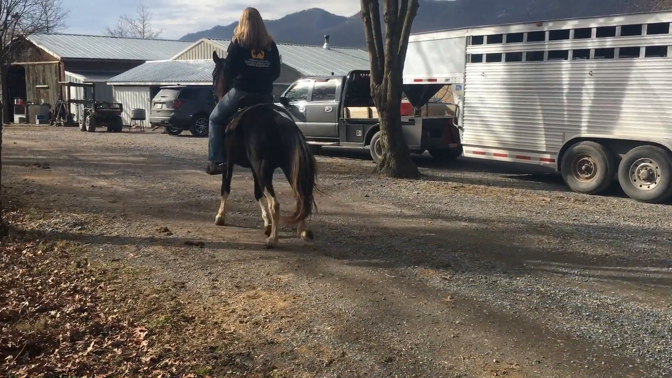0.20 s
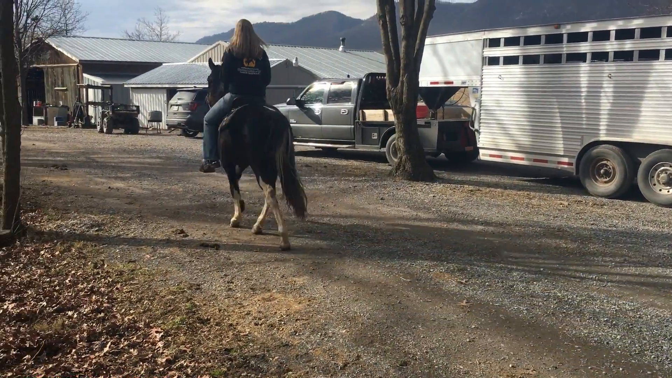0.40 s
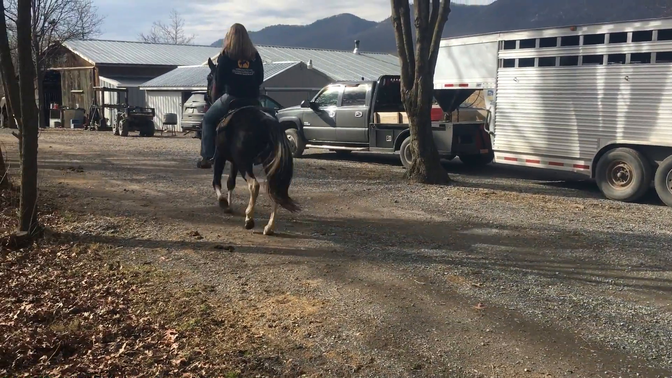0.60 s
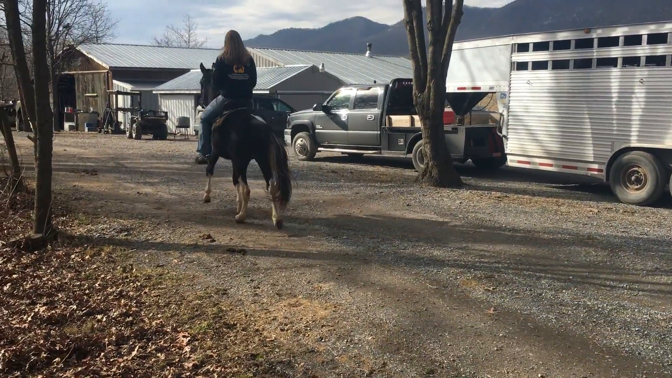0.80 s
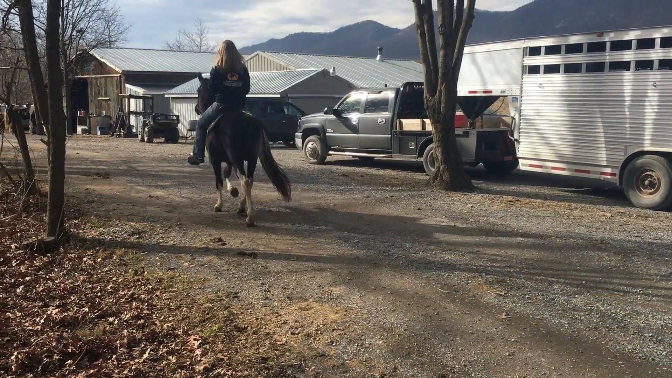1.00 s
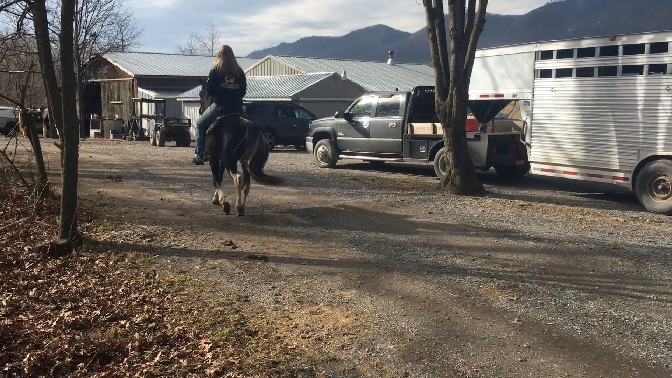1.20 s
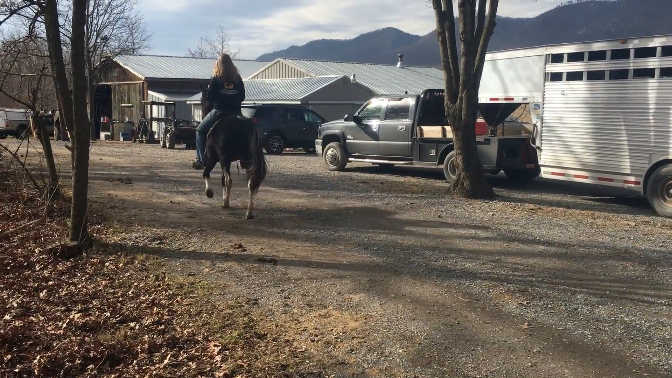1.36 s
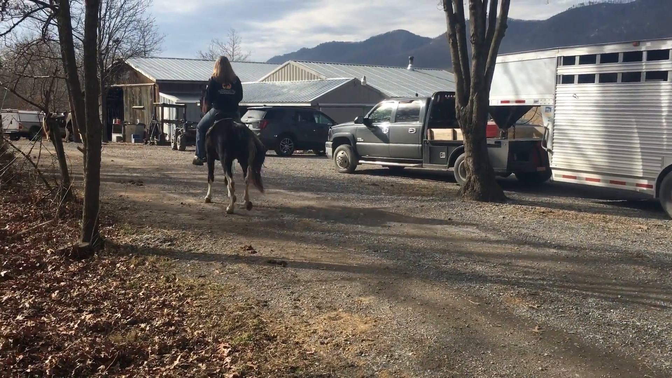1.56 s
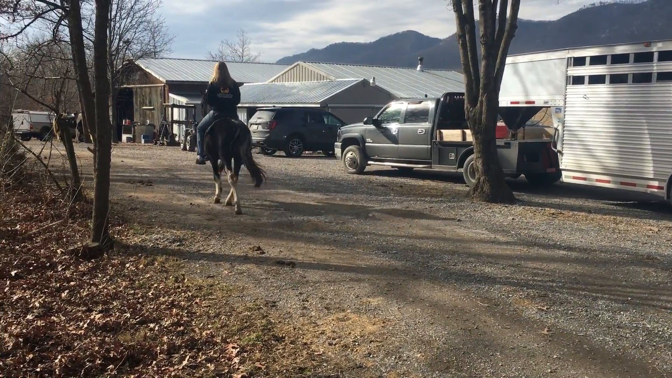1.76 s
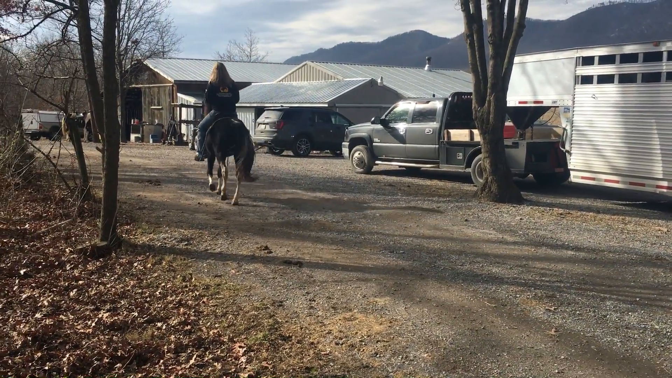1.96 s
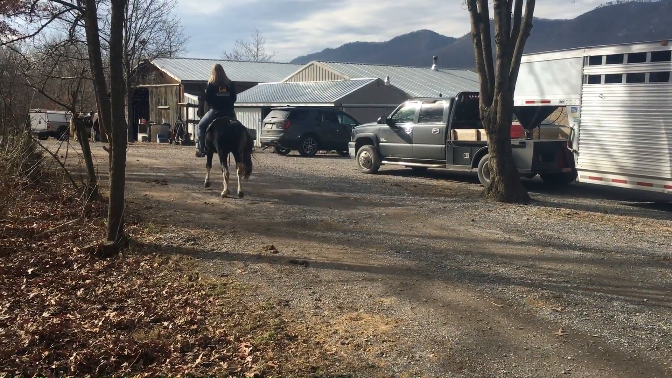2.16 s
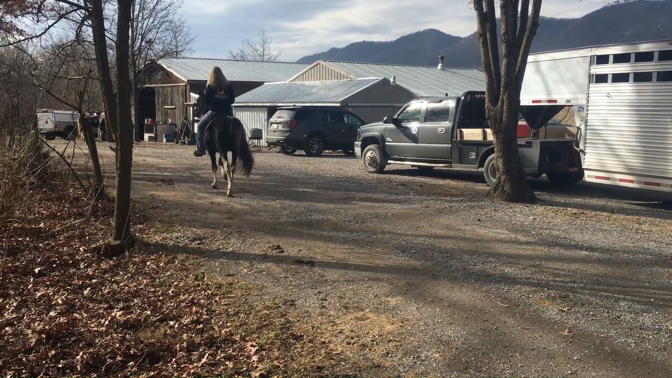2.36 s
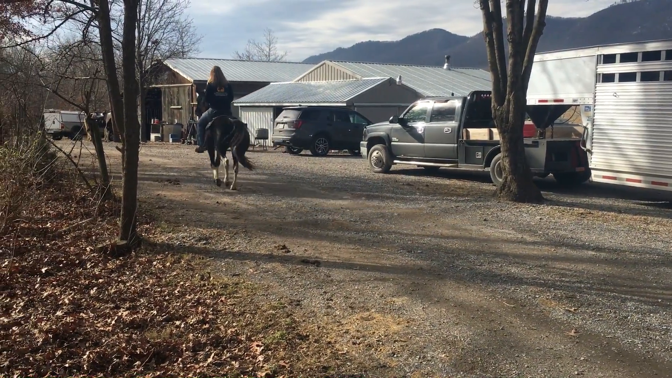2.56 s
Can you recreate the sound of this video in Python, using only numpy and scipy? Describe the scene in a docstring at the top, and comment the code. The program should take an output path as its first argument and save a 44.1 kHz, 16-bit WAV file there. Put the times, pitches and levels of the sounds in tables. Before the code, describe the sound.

Hooves of a briskly walking horse crunch over gravel near the microphone in an open yard. Larger stones knock, chips tick and loose grit settles between the steps, over a quiet rumble and a faraway drone.

```python
"""Horse on a gravel drive

Outdoors, on one microphone: a horse walks briskly by. Each hoof packs the gravel in a crunch
of tiny stone clicks over a soft thud; larger stones knock and chips tick. Grit trickles between
steps and the yard answers faintly, over a low rumble and a distant drone and hum."""
import sys
import numpy as np
from scipy import signal
from scipy.io import wavfile
from scipy.ndimage import uniform_filter1d

SR = 44100
rng = np.random.default_rng(int(sys.argv[2]) if len(sys.argv) > 2 else 0)


def materialize(psi):
    """Save the field psi as 16-bit PCM at rate SR to the path in sys.argv[1].

    A 1-D psi becomes a single channel; in a 2-D psi each row is a channel.
    """
    bounded = np.clip(np.atleast_2d(psi).T, -1, 1)
    quanta = np.round(bounded * 32767).astype(np.int16)
    wavfile.write(sys.argv[1], SR, quanta)


N = 116865


def amp(db):
    """Decibels to gain."""
    return 10 ** (np.asarray(db) / 20)


def unit(x):
    """Scales to rms 1."""
    return x / np.sqrt(np.mean(x ** 2) + 1e-20)


def as_loud_as(x, reference):
    """Scales to the rms of the reference."""
    return unit(x) * np.sqrt(np.mean(reference ** 2))


def read(points, hz):
    """Reads a spectrum on a log-frequency axis."""
    f, value = np.transpose(points)
    return np.interp(np.log(hz + 1), np.log(f + 1), value)


def fader(levels):
    """Gain that glides through (time, level) points."""
    return amp(np.interp(np.arange(N) / SR, *np.transpose(levels)))


def treble(hz, start_hz=1600):
    """Octaves above the start of the treble, up to two."""
    return np.clip(np.log2((hz + 1) / start_hz), 0, 2)


def add(mix, s, sound):
    """Mixes a sound in at time s."""
    part = mix[round(s * SR):][:len(sound)]
    part += sound[:len(part)]


def colour(x, db_at, size=2048):
    """Causal filter whose gain in dB is the function db_at of frequency."""
    log_gain = np.log(amp(db_at(abs(np.fft.fftfreq(size, 1 / SR)))))
    taps = np.fft.ifft(np.exp(np.conj(signal.hilbert(log_gain)))).real
    return signal.fftconvolve(x, taps[:size // 2])[:len(x)]


def clicks(length, per_s, spread_db):
    """Stones touch at random moments, most lightly and a few hard."""
    chance, sign = rng.random((2, length))
    force = amp(spread_db * np.minimum(rng.exponential(1, length), 4))
    return (chance < per_s / SR) * np.sign(sign - .5) * force


def pebbles(length, per_s=3400, sizes=20, decay_cycles=1.41):
    """Each random click rings one size of pebble for a few cycles."""
    hits, kind = clicks(length, per_s, spread_db=3.5), rng.integers(0, sizes, length)
    t, out = np.arange(256) / SR, np.zeros(length)
    for k, hz in enumerate(np.geomspace(650, 7000, sizes)):
        ring = np.cos(2 * np.pi * hz * t) * np.exp(-t * hz / decay_cycles) * hz / SR * 9
        ring[0] += .6  # the contact itself
        out += np.convolve(hits * (kind == k), ring)[:length]
    return out


# Colour of the open air, far off (frequency [Hz], gain [dB])
AIR_COLOUR = [(15, -33), (35, -36), (70, -13), (105, 9), (136, 6.5), (200, 0), (300, -2), (513, -13),
              (900, -5), (1290, -8.5), (2080, -19), (3070, -14), (4000, -25.5), (6720, -37.5),
              (10500, -39.5), (16000, -44)]

def air(level_db=-56, patch_db=3.5):
    """Distant outdoor drone and faint hiss, drifting in patches."""
    hz = np.fft.rfftfreq(1024, 1 / SR)
    real, imag, patches = rng.standard_normal((3, N // 256 + 5, len(hz)))
    patches = uniform_filter1d(patches, size=14, axis=0)  # smooth in time
    patches = unit(uniform_filter1d(patches, size=8, axis=1))  # and in frequency
    spectra = (real + 1j * imag) * amp(read(AIR_COLOUR, hz) + patch_db * patches)
    return amp(level_db) * unit(signal.istft(spectra.T, nperseg=1024, noverlap=768)[1][:N])


# Rumble at the microphone (time [s], level [dB])
RUMBLE_SWELLS = [(0, -61.5), (.2, -61), (.38, -56), (.46, -64.5), (.6, -47.5), (.68, -62), (0.769, -48),
                 (.87, -61), (.96, -51), (1.03, -54.5), (1.14, -51.5), (1.35, -57), (1.58, -56.5),
                 (1.9, -56.5), (2.1, -53), (2.33, -57.5), (2.45, -60.5), (2.65, -53.5)]
# Colour of the rumble (frequency [Hz], gain [dB])
RUMBLE_COLOUR = [(15, -29), (30, -5), (45, -6), (65, 4.5), (90, -3), (140, -7), (250, -18), (600, -55)]

def rumble():
    """A low outdoor rumble that swells and sinks."""
    low = colour(rng.standard_normal(N), lambda hz: read(RUMBLE_COLOUR, hz), size=8192)
    return unit(low) * fader(RUMBLE_SWELLS)


def hum(hz=135.5, level_db=-61.5, waver=0.024, flutter=0.47):
    """A faint hum in the distance, wavering in pitch and level."""
    slow = uniform_filter1d(uniform_filter1d(rng.standard_normal((2, N)), size=4000), size=2000)
    drift, swell = map(unit, slow)
    phase = 2 * np.pi * np.cumsum(hz * (1 + waver * drift)) / SR
    return amp(level_db) * unit(np.sin(phase) * (1 + flutter * swell))


# Colour of the drive's crushed gravel (frequency [Hz], gain [dB])
GRAVEL_COLOUR = [(100, -42.5), (420, -6.5), (650, 4), (1000, 2), (1600, 3.5), (2050, -8.5), (2600, -1.5),
                 (3250, 2.5), (3800, -16), (6300, -23), (8500, -31), (15000, -75)]
# Loose grit on the drive (time [s], level [dB])
GRIT_LEVELS = [(0, -53), (.2, -61.5), (.35, -55.5), (.5, -63.5), (.72, -55.5), (.88, -64), (1.0, -49.5),
               (1.19, -64), (1.32, -48.5), (1.46, -52), (1.59, -59.5), (1.8, -56), (1.9, -63.5), (2.1, -52),
               (2.23, -73), (2.42, -51), (2.55, -81), (2.65, -48)]

def grit():
    """Kicked grit rolls and settles between the steps."""
    trickle = colour(pebbles(N, per_s=1300), lambda hz: read(GRAVEL_COLOUR, hz))
    return unit(trickle) * fader(GRIT_LEVELS)


def hoof_load(t, hold_s, attack_s, release_s, sag_db_per_s=92):
    """Rises, sags while the hoof bears down, then dies away."""
    release = np.exp(-np.maximum(t - hold_s, 0) / release_s)
    return np.minimum(t / attack_s, 1) * amp(-sag_db_per_s * t) * release


# Colour of the soft ground under the drive (frequency [Hz], gain [dB])
THUD_COLOUR = [(25, -29), (60, -13.5), (110, -12.5), (165, -6), (195, 1.5), (235, -13.5), (330, -17),
               (500, -34), (1500, -60.5)]
# Colour of a stone chip's tick (frequency [Hz], gain [dB])
CHIP_COLOUR = [(200, -4), (1200, 18.5), (3000, 11.5), (4200, -8), (6300, 10), (8500, -10), (12500, -18.5),
               (16000, -21.5)]
# Hooves on gravel (time [s], hold [s], level [dB], ring [Hz], treble [dB/octave], thud [dB])
HOOF_CRUNCHES = [ (.002, 0.0092, -39, 2520, 4, -52), (.061, .007, -36.5, 1410, 4, -45),
                 (.236, 0.013, -36, 910, 0, -44), (0.245, 0.031, -37.5, 860, 6, -44),
                 (.405, 0.0058, -44, 800, 2.5, -45.5), (.568, 0.0047, -39.5, 1060, 7, -43),
                 (0.577, 0.026, -32.5, 1090, -1, -48.5), (0.656, 0.011, -39.5, 1620, 1.5, -58),
                 (.692, 0.0093, -43, 1380, 1, -76), (0.707, 0.0048, -42, 1600, 1, -47.5),
                 (0.836, 0.0061, -50, 1140, 1, -66), (.914, 0.017, -33, 1410, 3, -55),
                 (0.941, 0.0053, -34.5, 1420, 6.5, -76), (0.976, 0.014, -39.5, 1300, 3.5, -52),
                 (1.062, 0.004, -32, 1190, -13.5, -58), (1.085, 0.008, -39.5, 1180, -6, -48),
                 (1.24, 0.023, -33, 1190, -1.5, -44.5), (1.266, 0.021, -36.5, 1510, 3, -45),
                 (1.325, 0.061, -47.5, 1300, 9, -55), (1.383, 0.015, -41.5, 1300, 3.5, -45.5),
                 (1.404, 0.002, -25.5, 1600, -4, -39.5), (1.423, 0.017, -50, 1260, 7, -55),
                 (1.619, 0.01, -30.5, 1390, 3.5, -53), (1.638, 0.015, -38, 1300, 4, -48.5),
                 (1.690, 0.026, -44.5, 1280, 4, -53.5), (1.722, 0.024, -34, 1290, -2, -54.5),
                 (1.757, 0.0096, -37.5, 1300, 2, -66), (1.929, 0.008, -34.5, 1430, 3.5, -44),
                 (1.947, 0.015, -35.5, 1280, -1.5, -40.5), (1.966, 0.0094, -41, 1460, 3.5, -44.5),
                 (2.070, 0.013, -37, 1170, -0.5, -58), (2.274, 0.0089, -32.5, 1280, 1, -67),
                 (2.289, 0.017, -40.5, 1160, 2, -59), (2.375, 0.0054, -48, 2480, 4.5, -62),
                 (2.407, 0.007, -39.5, 1250, 3, -67), (2.613, 0.017, -40, 980, 0, -52)]

def crunch(hold_s, level_db, ring_hz, tilt, thud_db, size=6000):
    """A hoof packs the gravel, makes the finest chips tick, and pushes on the ground below."""
    def packed_gravel(hz):
        octaves = np.log2((hz + 1) / ring_hz)
        resonance_db = 9 * np.exp(-.5 * (octaves / 0.25) ** 2)
        return read(GRAVEL_COLOUR, hz) + resonance_db + tilt * treble(hz)
    t = np.arange(size) / SR
    press = hoof_load(t, hold_s, attack_s=0.0027, release_s=0.0068)
    stones = as_loud_as(colour(pebbles(size) * press, packed_gravel), press)
    push = hoof_load(t, hold_s, attack_s=0.0079, release_s=0.0073)
    thud = colour(rng.standard_normal(size) * push, lambda hz: read(THUD_COLOUR, hz))
    ticks = colour(clicks(size, per_s=270, spread_db=1.5), lambda hz: read(CHIP_COLOUR, hz))
    fines = amp(tilt - 29.5) * unit(ticks) * press
    return amp(level_db) * (stones + fines) + amp(thud_db) * as_loud_as(thud, push)


# Reverberation of the yard (frequency [Hz], time to fall 60 dB [s])
YARD_DECAY = [(150, 0.43), (1200, 0.36), (3200, 0.37), (6000, 0.39), (12000, 0.14)]

def yard(x, echoes_per_s=2000, gap_s=.012):
    """Scattered echoes come back to the microphone from trees, vehicles and barns."""
    echoes = rng.standard_normal(SR) * (rng.random(SR) < echoes_per_s / SR)
    echoes *= np.arange(SR) > gap_s * SR
    hz, t, spectra = signal.stft(echoes, SR, nperseg=256)
    decay = amp(-60 * t / read(YARD_DECAY, hz)[:, None])
    tail = signal.istft(spectra * decay, SR, nperseg=256)[1]
    return signal.fftconvolve(x, tail / np.linalg.norm(tail))[:N]


# Colour of a sharp stone crack (frequency [Hz], gain [dB])
CRACK_COLOUR = [(100, -35.5), (300, -3.5), (450, -9), (600, -1), (1000, -1.5), (1600, 0.5), (2050, -4),
                (3100, 4), (3800, -17.5), (6300, -18), (8500, -36), (15000, -44.5)]
# Larger stones (time [s], relative level [dB], ring [Hz], crack over ring [dB], treble [dB/octave])
STONE_KNOCKS = [ (0.052, -32.5, 1430, 5.5, -11), (.2483, -23, 873, 1.5, -1.5), (.3812, -19, 733, -8, -2),
                (0.5755, -17, 1020, -11, 2.5), (0.5924, -23, 1130, -11.5, 13), (0.5981, -26, 1390, 4, -7),
                (.6650, -26, 1120, -0.5, -3.5), (.7120, -25.5, 1600, 2.5, -2),
                (.7372, -28.5, 1110, -4.5, -12), (.7540, -31, 1020, 6, 0), (0.779, -41, 1400, 2, 2),
                (0.8172, -24.5, 920, -3.5, -3), (0.92, -21.5, 1410, -24, -4), (.9440, -42, 1490, 5, -8),
                (.9583, -32.5, 1500, 5.5, -5), (1.0663, -19, 1180, -5.5, -9.5),
                (1.228, -30.5, 1240, 1, -11), (1.2513, -30, 1060, -6, 8), (1.3535, -25, 1330, 1, 1),
                (1.3845, -25.5, 1140, 0, 1), (1.406, -25, 690, 4.5, -10), (1.4085, -23.5, 1600, 1, 11.5),
                (1.6158, -19, 1350, -6, 4.5), (1.6226, -17.5, 1600, -14, 0), (1.6720, -33, 1220, -2.5, 3),
                (1.6898, -28.5, 1300, -10, -1), (1.7278, -8, 1240, -12, -1), (1.7423, -19.5, 1300, -3, -2),
                (1.7938, -37, 1200, -6, 7.5), (1.9477, -34, 1200, 10, -1.5), (1.953, -20.5, 1670, -5.5, 6),
                (2.0185, -29, 1310, -3.5, -0.5), (2.0720, -25.5, 1280, -4, -2),
                (2.2767, -28, 1260, 5.5, -3), (2.3425, -29.5, 2740, -1.5, -5),
                (2.3622, -20, 2700, -4.5, -3)]

def knock(level_db, ring_hz, crack_db, tilt, size=1500):
    """The hoof meets a larger stone: a damped hollow ring, a crack, and chatter of its neighbours."""
    rise_s, decay_cycles, low_cut_hz = 0.000833, 1.69, 490
    crack_rise_s, snap_s, chatter_s = 0.0016, 0.00093, 0.0049
    t = np.arange(size) / SR
    late = t - rise_s
    shape = np.minimum(t / rise_s, 1) ** 2 * np.exp(-np.maximum(late, 0) * ring_hz / decay_cycles)
    ring = np.sin(2 * np.pi * ring_hz * late) * shape
    ring = signal.sosfilt(signal.butter(2, low_cut_hz, "high", fs=SR, output="sos"), ring)
    snap = unit(rng.standard_normal(size) * np.exp(-abs(late) / snap_s))
    chatter = unit(pebbles(size) * np.exp(-t / chatter_s))
    contact = (snap + amp(-5.5) * chatter) * np.minimum(t / crack_rise_s, 1)
    crack = colour(contact, lambda hz: read(CRACK_COLOUR, hz) + tilt * treble(hz))
    return amp(level_db + 0.5) * (ring + amp(crack_db) * as_loud_as(crack, ring))


# Chips snapping off the hoof (time [s], level [dB])
CHIP_TICKS = [(.9185, -30), (1.0615, -46), (1.1115, -45), (1.2205, -44.5), (1.4055, -37), (1.4780, -43.5),
              (1.5225, -49), (1.9525, -56)]

def chip(level_db, decay_s=0.0011, size=600):
    """A small sharp stone gives one bright tick."""
    shape = np.exp(-np.arange(size) / SR / decay_s)
    tick = colour(rng.standard_normal(size) * shape, lambda hz: read(CHIP_COLOUR, hz))
    return amp(level_db) * as_loud_as(tick, shape)


def scene():
    """One microphone in the open yard: hooves and grit in front, air, rumble and hum behind."""
    hooves = np.zeros(N)
    for table, sound in (HOOF_CRUNCHES, crunch), (STONE_KNOCKS, knock), (CHIP_TICKS, chip):
        for s, *row in table:
            add(hooves, s, sound(*row))
    return (hooves + amp(-20) * yard(hooves) + grit() + air() + rumble() + hum())[None]


def record(dry):
    """The recorder's band limit."""
    edge_hz = 16150
    lowpass = signal.firwin(511, edge_hz, window=("kaiser", 9), fs=SR)
    return signal.oaconvolve(dry, lowpass[None], "same")


dry = scene()
out = record(dry)
materialize(out)
```